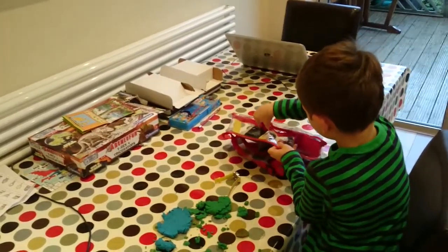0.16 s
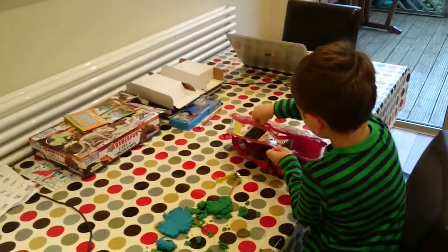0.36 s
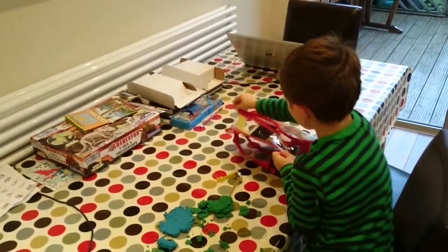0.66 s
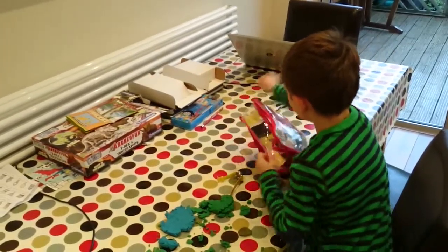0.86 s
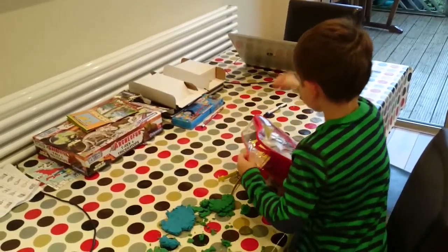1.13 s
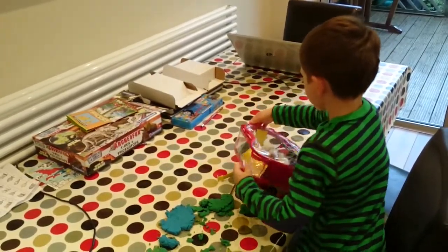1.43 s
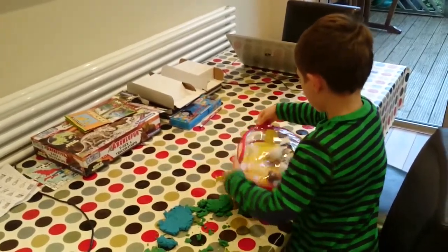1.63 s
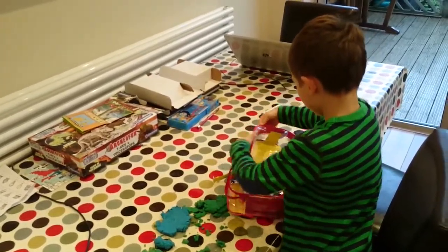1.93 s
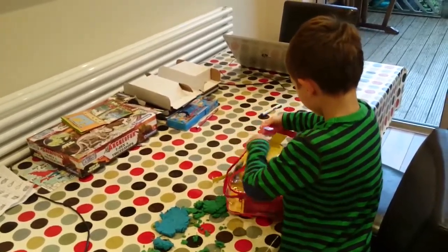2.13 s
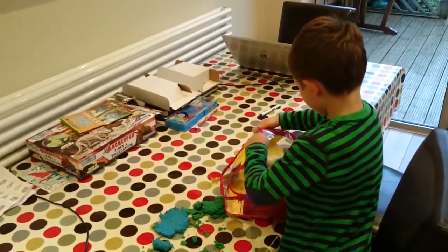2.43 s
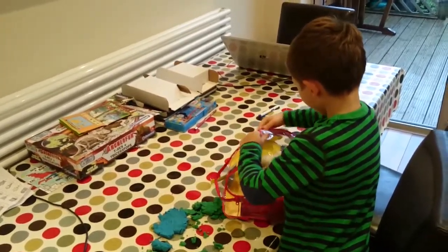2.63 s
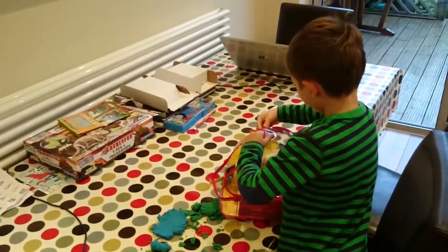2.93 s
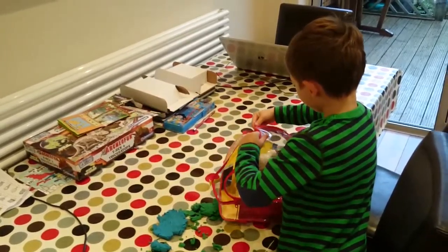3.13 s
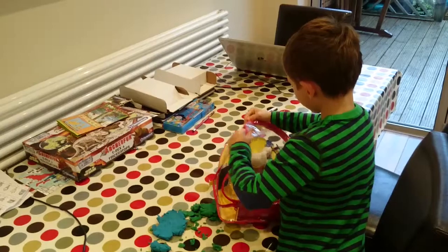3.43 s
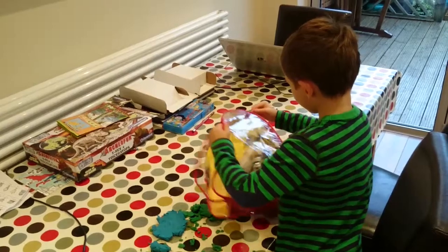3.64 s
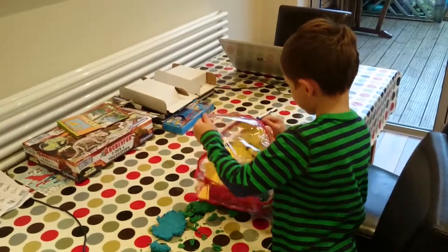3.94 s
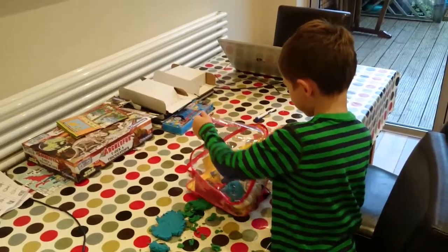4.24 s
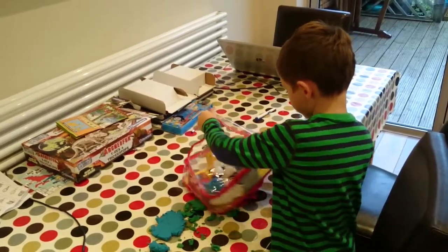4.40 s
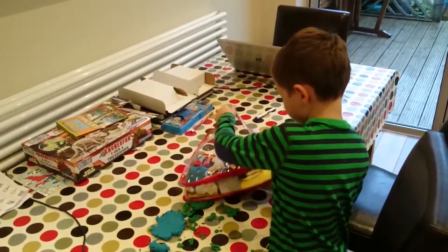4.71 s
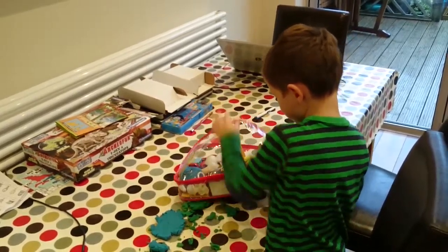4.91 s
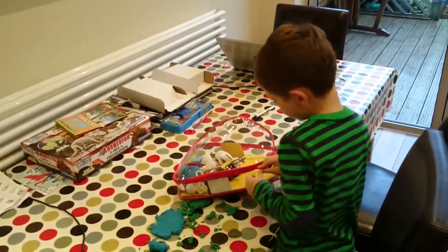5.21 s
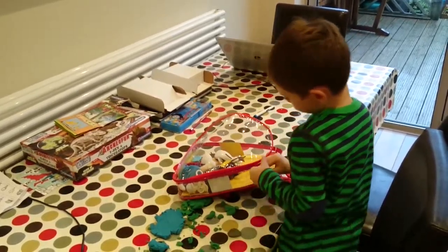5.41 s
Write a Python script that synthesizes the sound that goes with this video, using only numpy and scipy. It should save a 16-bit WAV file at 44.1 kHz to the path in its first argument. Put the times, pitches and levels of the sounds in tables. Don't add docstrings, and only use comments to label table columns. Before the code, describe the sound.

Hands work a stiff plastic toy bag about two metres from a phone in a bare, reverberant room. Crinkling comes in uneven bursts with creases cracking and toys knocking, a short rising squeak early on, the sharpest snap just after two seconds, a near-quiet pause, then a chirp, a loud rustle and soft table thuds, and sparse late rummaging.

```python
import sys
import numpy as np
from scipy import signal
from scipy.fft import rfft, irfft, next_fast_len
from scipy.io import wavfile

SR = 44100
rng = np.random.default_rng(int(sys.argv[2]) if len(sys.argv) > 2 else 0)


def put_to_file(sound):
    columns = np.atleast_2d(sound).T
    safe = np.clip(columns, -1, 1)
    whole_steps = np.round(safe * 32767)
    wavfile.write(sys.argv[1], SR, whole_steps.astype(np.int16))


def undo_db(level):
    steps = np.asarray(level, float) / 20
    return 10 ** steps


N = 245371
SIZE = next_fast_len(N + SR)
HZ = np.maximum(np.arange(SIZE // 2 + 1) * SR / SIZE, 1)
TAIL, STAY = 20480, 8192


def on_hz(table, hz=HZ):
    table_hz, value = np.array(table).T
    return np.interp(np.log(hz), np.log(table_hz), value)


def shape(x, gain):
    return irfft(rfft(x, SIZE) * gain, SIZE)[..., :N]


def causal(db):
    size = 2 * len(db) - 2
    cepstrum = irfft(np.log(undo_db(db)))
    cepstrum[1:size // 2] *= 2
    cepstrum[size // 2 + 1:] = 0
    return np.exp(rfft(cepstrum))


def pair(size, likeness):
    mid, side = rfft(rng.standard_normal((2, size)))
    c = np.clip(on_hz(likeness, np.linspace(1, SR / 2, len(mid))), -.98, .98)
    return np.sqrt((1 + c) / 2) * mid + np.sqrt((1 - c) / 2) * side * np.array([[1], [-1]])


# frequency in Hz, level in dB per Hz.
QUIET = [(15, -22), (25, -21), (33, -12), (80, 1), (108, -4.5), (153, -5.5), (190, -8.5), (416, -11.5),
         (936, -15), (3500, -17), (5000, -21.5), (7920, -16), (10700, -27.5), (14400, -31), (16000, -27)]
# frequency in Hz, likeness from -1 to 1.
QUIET_LIKENESS = [(60, -0.57), (130, -0.51), (640, 0.26), (1400, -0.0025)]


def quiet(level_db=-69.5):
    hiss = irfft(pair(SIZE, QUIET_LIKENESS) * undo_db(on_hz(QUIET)), SIZE)[:, :N]
    return undo_db(level_db) * hiss / hiss.std()


# frequency in Hz, time to fall by 60 dB in seconds.
ROOM_T60 = [(300, 0.52), (750, 0.78), (1900, 0.44), (3700, 0.57), (7000, 0.46), (12500, 0.29)]
# frequency in Hz, likeness from -1 to 1.
LIKENESS = [(60, -0.95), (300, -0.88), (640, -0.88), (1400, -0.099), (3000, -0.061), (7000, -0.017)]
# seconds after the direct sound, left level in dB, right level in dB.
ECHOES = [
    (0, -2.5, -3),
    (.0016, -24, -7),
    (.0042, -9.5, -32),
    (.0058, -13, -13.5),
    (.0083, -6, -8),
]


def answer(direct_db, wet_db, gap_s=0.0017, lag_s=.00039, early=0.87, early_s=0.0045, beam_db=-1.5):
    t, hz = np.arange(TAIL) / SR, np.linspace(1, SR / 2, TAIL // 2 + 1)
    noise, tail = pair(TAIL, LIKENESS), 0
    centres = 100 * 2 ** np.arange(0, 7.6, 1.25)
    for centre_hz, row in zip(centres, np.eye(len(centres))):
        fade = undo_db(-60 * t / on_hz(ROOM_T60, centre_hz)) * np.clip(t / gap_s, 0, 1)
        near = early * min(centre_hz / 3000, 2.2) * np.exp(-t / early_s)
        fade *= undo_db(beam_db * min(centre_hz / 6000, 1)) + near
        tail = tail + irfft(noise * on_hz(list(zip(centres, row)), hz)) * fade
    out = undo_db(wet_db) * tail / np.sqrt(np.sum(tail ** 2, axis=1, keepdims=True))
    strays_s = 0.0007 * rng.random((len(ECHOES), 2))
    for (s, left_db, right_db), stray_s in zip(ECHOES, strays_s):
        out[0, int((s + (s > 0) * stray_s[0]) * SR)] -= undo_db(direct_db + left_db)
        out[1, int((s + lag_s) * SR)] += undo_db(direct_db + right_db)
    return out


# frequency in Hz, left minus right in dB.
LEAN = [(60, -4), (110, 3.5), (200, -2), (380, -0.5), (700, -1.5), (1290, -4.5), (2380, -4), (4400, -6),
        (8120, -7.5), (15000, 0)]


def lean(x):
    return shape(x, undo_db(on_hz(LEAN) * np.array([[.5], [-.5]])))


def room(x, direct_db, wet_db):
    padded = np.pad(x, (STAY, 2 * STAY))
    out = np.zeros((2, N + 3 * STAY + TAIL))
    crossfade = np.sin(np.pi * np.arange(2 * STAY) / (2 * STAY))
    for i in range(0, N + STAY, STAY):
        piece = padded[i:i + 2 * STAY] * crossfade
        reply = signal.fftconvolve(piece[None], answer(direct_db, wet_db), axes=1)
        out[:, i:i + 2 * STAY + TAIL - 1] += reply
    return lean(out[:, STAY:STAY + N])


def arrivals(x, gain_db=7, echo_db=-2):
    out = 0
    for s, left_db, right_db in ECHOES:
        port_db = np.array([[left_db], [right_db]])
        out = out + np.roll(x, int(s * SR)) * undo_db(gain_db + (s > 0) * echo_db + port_db)
    return lean(np.array([-np.roll(out[0], -17), out[1]]))


# start in seconds, peak in dB, pitch in Hz.
BUMPS = [
    (1.491, -80, 78.1),
    (2.252, -67, 188),
    (3.749, -55, 40.4),
    (3.768, -48.5, 206),
    (3.8, -51.5, 211),
    (3.87, -59, 60),
    (3.929, -54, 54.7),
    (3.978, -54.5, 158),
    (4.041, -55, 70),
    (4.219, -73, 75),
]


def bumps(rise_s=0.012, gain_db=6):
    t, out = np.arange(N) / SR, 0
    for s, db, hz in BUMPS:
        age = np.maximum(t - s, 0)
        swell = age / rise_s * np.exp(1 - age / rise_s)
        out = out + undo_db(db + gain_db) * swell * np.sin(2 * np.pi * hz * age)
    return out * np.array([[1], [-.78]])


# time in seconds, pitch in Hz, level in dB, third partial in dB over the first.
SQUEAKS = [
    [(.62, 562, -54, -12), (.645, 567.6, -35.5, -28), (.67, 606.5, -44.5, 10), (.7, 635, -49, 8),
     (.74, 641, -43, -27), (.78, 654, -93, 32)],
    [(3.58, 565.7, -37.5, -7), (3.61, 603, -41, -8), (3.66, 576, -88, -28)],
]


def squeaks(wobble=0.0094):
    t, out = np.arange(N) / SR, 0
    waver = np.interp(t, np.arange(0, 6, .006), rng.standard_normal(1000))
    for s, hz, db, third_db in map(np.transpose, SQUEAKS):
        pitch = np.interp(t, s, hz) * (1 + wobble * waver)
        phase = 2 * np.pi * np.cumsum(pitch) / SR
        tone = np.sin(phase) + undo_db(np.interp(t, s, third_db)) * np.sin(3 * phase)
        out = out + undo_db(np.interp(t, s, db, -140, -140)) * tone
    return out


def rings(table, rise_s, partner=1.047, partner_db=-5):
    t, out = np.arange(4096) / SR, np.zeros(N)
    for s, hz, db, t60 in table:
        tone = np.sin(2 * np.pi * hz * t) + undo_db(partner_db) * np.sin(2 * np.pi * partner * hz * t)
        fade = undo_db(db - 2.5 - 60 * t / t60) * (1 - np.exp(-t / rise_s))
        out[int(s * SR):][:4096] += fade * tone
    return out


# start in seconds, pitch in Hz, peak in dB, time to fall by 60 dB in seconds.
RINGS = [(.156, 1350, -39, 0.0075), (.447, 3690, -33, 0.025), (.47, 3760, -30.5, 0.02),
         (.495, 3670, -36, 0.023), (.525, 3600, -31, 0.016), (.538, 3840, -27, 0.015),
         (.51, 1054, -32.5, .04), (.705, 1386, -31.5, 0.035), (.77, 1090, -38.5, 0.04),
         (.81, 1336, -34, 0.04), (1.06, 1635, -27, .04), (1.078, 1620, -38, 0.026),
         (1.415, 1114, -31, 0.07), (1.443, 1080, -32, 0.036), (1.52, 3580, -35, .02),
         (2.243, 1220, -36, 0.027), (3.9, 2980, -33.5, 0.05), (.665, 1875, -31.5, 0.065),
         (.69, 1815, -38, 0.035), (.748, 1860, -42, 0.018), (1.555, 1920, -44, 0.037),
         (1.62, 1950, -41, 0.03), (.19, 1710, -38, 0.037), (.225, 1900, -48, 0.026),
         (1.042, 1430, -31.5, 0.019), (1.472, 1530, -40, .02), (1.491, 1890, -25.5, 0.084),
         (2.2128, 1270, -25, 0.015), (2.2515, 5900, -36, 0.002), (2.2516, 5000, -16, 0.0023),
         (2.7175, 3600, -29, 0.0099), (1.52, 1990, -39, 0.026), (3.79, 2060, -24, 0.019),
         (2.706, 3300, -34, 0.0065), (.4, 510, -41, 0.098), (.435, 520, -42, 0.068),
         (0.481, 523, -37.5, 0.096), (1.955, 2250, -39, 0.02), (4.96, 860, -36, 0.12),
         (2.885, 1880, -45, 0.012), (3.771, 6600, -26, .02), (4.343, 1235, -32, 0.015)]


def knocks():
    return rings(RINGS, .00005)


# start in seconds, pitch in
# Hz, peak in dB, time to fall by 60 dB in seconds.
PINGS = [(.0785, 5200, -45, .0015), (.079, 2000, -56, .01), (.1255, 5670, -40, .006),
         (.14, 7500, -38, 0.0048), (.3577, 5000, -48, .005), (.156, 2060, -29.5, 0.016),
         (1.428, 1190, -48, 0.0089), (1.709, 1540, -37, 0.0068), (1.472, 1500, -35.5, 0.03),
         (1.4872, 8260, -34, .006), (1.4885, 4850, -26, 0.013), (1.4865, 1980, -25, 0.0098),
         (1.6915, 8300, -44, .0013), (1.8846, 4910, -47, .005), (1.9649, 6300, -43, .003),
         (2.0138, 5000, -46, .002), (2.2145, 5830, -31, 0.0045), (2.257, 5300, -20, 0.0034),
         (.2665, 5100, -36, 0.0051), (.144, 8200, -33, 0.0046), (2.634, 880, -44, 0.006),
         (1.519, 3560, -31, .008), (2.2133, 1490, -44, 0.0051), (2.2516, 5960, -10, 0.003),
         (2.2518, 1920, -26, 0.005), (2.253, 3180, -19, 0.0035), (2.259, 7100, -20, 0.0034),
         (2.7115, 2000, -35, 0.0046), (2.885, 2500, -40, .005), (2.2124, 2300, -35, .004),
         (3.771, 10200, -23, 0.0076), (3.775, 15200, -36, .006), (4.3435, 2000, -36, .008),
         (5.03, 2200, -43, .006), (2.687, 1810, -44, 0.013), (2.7062, 7000, -47, 0.0031),
         (2.7075, 3390, -34, 0.012), (2.718, 3400, -30, 0.0097), (2.723, 2150, -31, 0.013),
         (3.4904, 4000, -58, .005), (3.657, 1710, -32.5, .012), (3.755, 3500, -28, .006),
         (3.776, 7600, -28, .008), (3.888, 4770, -36, .006), (4.6653, 3600, -45.5, .006),
         (4.7421, 3960, -44, 0.0052), (4.9536, 2940, -41, .008), (5.406, 6000, -62, .004),
         (5.427, 5950, -51, .005), (5.434, 1170, -62, .02),
         (.0787, 3300, -48, .002), (.1565, 2900, -36, .006), (.512, 3000, -31, .002),
          (.673, 2400, -33, .003), (.697, 2600, -31, .003), (1.6917, 5800, -47, .0015),
          (2.0136, 9000, -49, .0013), (2.74, 2300, -36, .012), (2.755, 2400, -38, .01)]


def clicks():
    return rings(PINGS, 0.00053)


# start in seconds, peak in dB, pitch in Hz.
TICKS = [
    [(0.3562, -37, 1890), (0.451, -32, 3610)],
    [(1.1654, -26, 1560)],
    [(1.89, -36, 1910), (1.9608, -43, 2230), (2.1574, -49, 1770)],
    [(4.1822, -35, 1800), (4.2954, -31, 1560), (4.3428, -33, 1550), (4.6032, -48, 2020), (4.702, -44, 1880),
     (4.8976, -36, 1820), (4.9584, -32, 1910), (5.4054, -44, 3390)],
]


def ticks(gain_db=-9, cycles=14):
    table = [(s, hz, db + gain_db, cycles / hz) for handful in TICKS for s, db, hz in handful]
    return rings(table, 0.00022)


BAND_HZ = [750, 1900, 3700, 7000, 12500]
OCTAVES = np.log2(np.array(BAND_HZ) / 1000)
BAND_WIDTH_HZ = [900, 1400, 2500, 4800, 5500]
# frequency in Hz, level in dB per Hz.
FILM = [(71, -63), (120, -20.5), (256, -15.5), (402, -9.5), (445, -9.5), (503, -4.5), (949, -7),
        (1090, -6.5), (1720, -4), (1860, -1), (2430, -6.5), (3520, -9), (5750, -11), (6500, -9),
        (16000, -16)]


def creases(table, run_s, tear, gain_db, skirt_db=-36, steeper_above=1.66, top_db=-5.0, thin_db=-6.0):
    t, hz = np.arange(4096) / SR, np.linspace(1, SR / 2, 2049)
    usual_db = on_hz(FILM, np.array(BAND_HZ)) + 10 * np.log10(np.array(BAND_WIDTH_HZ) / (SR / 2))
    film_db = on_hz(FILM, hz) - on_hz(list(zip(BAND_HZ, usual_db)), hz)
    film_db += thin_db * np.log2(np.maximum(BAND_HZ[0] / hz, 1))
    octave = np.clip(np.log2(hz / 1000), OCTAVES[0], OCTAVES[-1])
    film_db += top_db * np.interp(octave, OCTAVES[-2:], [0, 1])
    out = np.zeros(N + 4096)
    for (s, db, centre, narrow_db), noise in zip(table, rng.standard_normal((len(table), 4096))):
        steepness = np.where(octave > centre, steeper_above, 1)
        hump_db = np.maximum(-narrow_db * (octave - centre) ** 2 * steepness, skirt_db)
        snap = (t == 0) + tear * noise * np.exp(-t / run_s)
        snap = rfft(snap / np.linalg.norm(snap))
        out[int(s * SR):][:4096] += undo_db(gain_db) * irfft(snap * causal(film_db + db + hump_db))
    return out[:N]


# start in seconds, energy in dB, centre in octaves over 1 kHz,
# narrowness in dB per octave squared.
TEARS = [(0.4455, -18.5, 0, 0.5), (0.889, -20, 2.5, 2), (0.915, -15, 0.53, 1.5), (1.042, -8, 1.06, 4.5),
         (1.0644, -17.5, 2.2, 1.5), (1.094, -15.5, 3, -1), (1.135, -11, 6, 5), (1.4005, -22, 0.7, 0.5),
         (1.426, -14, 0.5, 4.5), (1.4735, -9, .5, 14), (1.4895, -7, 1.5, 0.9), (1.52, -16, -2, 16),
         (1.708, -19.5, 1.5, 16), (1.819, -19.5, 1, 2), (2.189, -27, 2, 2), (2.62, -22.5, 1.55, 7),
         (2.6338, -15, 0.5, 2), (2.68, -25, 4, 8), (3.6535, -15.5, 1.9, 2.5), (3.7524, -9, 4.5, 1),
         (3.7693, -5.5, 4.5, 0.5), (3.889, -13.5, 1.4, 0), (4.049, -15, 1.5, 0.2), (4.183, -16.5, 1.1, 7),
         (0.622, -20, 3.5, 1), (4.2995, -16.5, 2, 3), (4.702, -23, 0.6, 3.5), (4.956, -16.5, 1.5, 0.5),
         (5.0293, -19, -0.1, 2), (5.1394, -17, 1.22, 6.5)]


def tears():
    return creases(TEARS, 0.0045, 0.086, 0.13)


# start in seconds, energy in dB, centre in octaves over 1 kHz,
# narrowness in dB per octave squared.
CRACKS = [(0.0785, -30, 1.9, 7), (0.1255, -24, 2.55, 11), (0.1435, -14.5, 2.4, 3), (0.1558, -5.5, 0.82, 7),
          (0.2662, -23.5, 2.65, 4), (0.5095, -17.5, 2, -1.5), (1.1645, -7, 0.31, 0.5),
          (1.168, -18, 3.9, 2.5), (1.0955, -21, 3.9, 3), (1.4868, -4.5, 1.76, 4), (2.2123, -4, 0.51, 11),
          (2.2165, -11, 1.25, 4.5), (2.2516, -3.5, 1.08, 3.5), (2.2518, -2.5, 2.58, 18.5),
          (2.252, -8, 2.32, 18), (2.4895, -25.5, 1.3, 1), (2.706, -13, 1.46, 2), (2.7062, -17, 4.3, 4.5),
          (2.7178, -17.5, 0.51, 3.5), (2.885, -16, 1.15, 8), (3.462, -39.5, 3.3, 2),
          (4.3425, -7, 0.62, 6.5), (4.481, -28, 2.2, 5), (4.6025, -24.5, 1.24, 1.5),
          (4.784, -17.5, 1.34, 1.5), (4.8437, -17.5, 0.67, 1), (5.428, -28.5, 1.2, 0.2)]


def cracks():
    return creases(CRACKS, 0.00054, 0.24, 0.35)


def gestures(t, table, spread_db, pivot, rise_s, fall_s):
    s, held_s, db, bright_db = np.array(table).T[:, :, None]
    away = np.maximum((s - t) / rise_s, (t - s - held_s) / fall_s)
    course_db = db - 20 * np.maximum(away, 0)
    region_db = np.array(spread_db) + bright_db * (OCTAVES - pivot)
    return (undo_db(region_db) ** 2).T @ undo_db(course_db) ** 2


# full strength reached in seconds, hold in seconds, level in dB,
# brightness in dB per octave.
SHIFTS = [(.0, 0.0092, -65.5, 0), (.13, 0.1, -57.5, -9), (.35, 0.018, -49.5, -4), (.44, 0.093, -49, -5.5),
          (.57, 0.033, -45, 2), (.67, 0.077, -41.5, 3.5), (.8, 0.056, -49, -2), (.9, 0.069, -57, -3),
          (1.045, 0.034, -44.5, 2.5), (1.09, 0.039, -41, -1.5), (1.2, 0.076, -52.5, -7),
          (1.41, 0.11, -46.5, 0.5), (1.73, 0.11, -50, -1), (1.84, 0.12, -53, 0), (2.215, 0.012, -43.5, 1),
          (2.4, 0.087, -65, 7.5), (2.69, 0.029, -46, 2), (2.9, .15, -71.5, 7.5), (3.515, .03, -61, 0),
          (3.57, 0.093, -45.5, 3), (4.23, .05, -53, -3), (1.03, .01, -56, 3), (3.69, 0.1, -39.5, 1),
          (3.9, 0.06, -49.5, 0), (4.02, 0.036, -47.5, -0.5), (4.195, 0.086, -45.5, -3),
          (4.36, 0.038, -55.5, -12.5), (4.72, 0.06, -55.5, 3), (4.79, 0.13, -49, 3), (4.949, 0.048, -45, 7),
          (5.05, 0.05, -57, -5), (5.36, 0.039, -68, 6.5), (5.53, .05, -62.5, 4)]
GRIPS = [(.0, 0.041, -67.5, -5), (.125, 0.041, -52.5, -2), (.35, 0.058, -52.5, -2.5), (.45, 0.089, -45, 0),
         (.56, 0.096, -46, -7.5), (.63, 0.017, -45.5, 6.5), (.71, 0.12, -53.5, 3), (.93, 0.039, -60, -5),
         (1.045, 0.14, -43.5, -3.5), (1.3, 0.26, -56, -9.5), (1.44, 0.075, -50, -2.5),
         (1.64, 0.073, -57.5, -9.5), (1.74, 0.07, -54, -4), (1.92, 0.11, -62.5, -4.5),
         (2.202, 0.11, -51, -3.5), (2.4, 0.12, -62.5, -11), (2.705, 0.035, -70, 2), (3.56, 0.048, -53, 1.5),
         (3.681, 0.07, -39.5, 4), (3.772, 0.025, -40.5, 4), (3.505, .03, -59.5, -10.5),
         (3.61, 0.034, -55, 3), (1.5, 0.035, -56.5, 5), (2.71, 0.023, -64, 8), (3.86, 0.13, -52.5, -0.5),
         (4.02, 0.018, -45.5, 0), (4.195, 0.04, -46.5, -2.5), (4.29, 0.071, -53.5, -2),
         (4.5, 0.32, -61, -9), (4.71, 0.05, -58, -11), (4.8, 0.15, -62, 1), (4.959, 0.0081, -47, 2.5),
         (5.05, 0.12, -57.5, -8), (5.405, 0.04, -63.5, -7)]
TOYS_DB = [-0.5, -2.5, -13, -22, -51]
FINGERS_DB = [-22, -44, 1, -3.5, -6.5]


def handling(rest_db=-91):
    t = np.arange(0, N / SR + .01, .002)
    toys = gestures(t, SHIFTS, TOYS_DB, pivot=0.23, rise_s=0.098, fall_s=0.097)
    fingers = gestures(t, GRIPS, FINGERS_DB, pivot=1.894, rise_s=0.063, fall_s=0.09)
    level = np.sqrt(toys + fingers + undo_db(rest_db) ** 2)
    return [np.interp(np.arange(N) / SR, t, row) for row in level]


def bands(trains):
    out = 0
    for train, row in zip(trains, np.eye(len(BAND_HZ))):
        gain = undo_db(on_hz(FILM)) * np.sqrt(on_hz(list(zip(BAND_HZ, row))))
        out = out + shape(train, gain / np.sqrt(np.mean(gain ** 2)))
    return out


def crinkle(per_s=2500, scatter_db=4.5, largest=4.07, shared=0.38, flutter_db=1.9, effort_db=-1.7):
    chance, sign, size = rng.random((6, 3, N)).transpose(1, 0, 2)
    sizes = undo_db(scatter_db * np.minimum(-np.log(1 - size), largest))
    snaps = (chance < per_s / SR) * np.sign(sign - .5) * sizes
    snaps /= snaps.std(axis=1, keepdims=True)
    flurry = np.interp(np.arange(N) / SR, np.arange(0, 6, .012), rng.standard_normal(500))
    effort = undo_db(effort_db + flutter_db * flurry)
    trains = []
    for own, level in zip(snaps[:-1], handling()):
        mixed = np.sqrt(shared) * snaps[-1] + np.sqrt(1 - shared) * own
        trains.append(mixed * level * effort)
    return bands(trains)


def scene():
    cracking, ticking = cracks(), ticks()
    sharp = cracking + tears() + knocks() + undo_db(1) * ticking
    aimed = clicks() + undo_db(-23.5) * cracking + ticking
    rustle = room(crinkle() + squeaks(), direct_db=-16.0, wet_db=-2.3)
    return rustle + room(sharp, direct_db=-13.0, wet_db=-2.3) + arrivals(aimed) + bumps() + quiet()


# resonance in Hz, width in Hz, boost in dB.
PORTS = [
    (1930, 1170, 1),
    (3600, 610, 3),
    (4250, 1100, -2.5),
    (6600, 280, 1),
]


def ports(x):
    ports_db = sum(db / (1 + (2 * (HZ - hz) / width) ** 2) for hz, width, db in PORTS)
    return shape(x, undo_db(ports_db) * (HZ < 15800)) - .0004


def roll_off(x):
    return signal.sosfilt(signal.butter(12, 16180, fs=SR, output="sos"), x)


def record(dry):
    return roll_off(ports(dry))


dry = scene()
out = record(dry)
put_to_file(out)
```